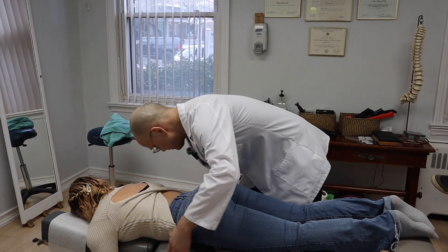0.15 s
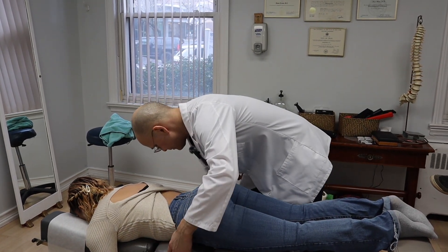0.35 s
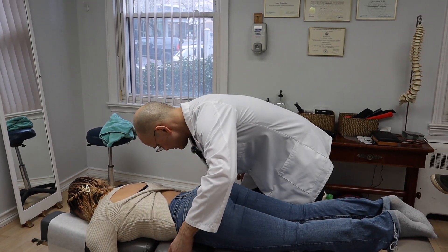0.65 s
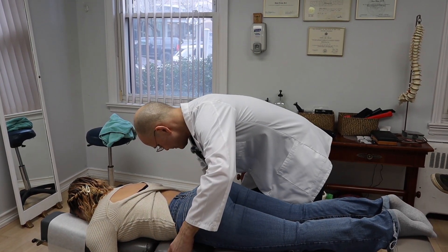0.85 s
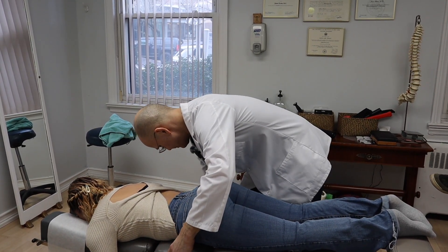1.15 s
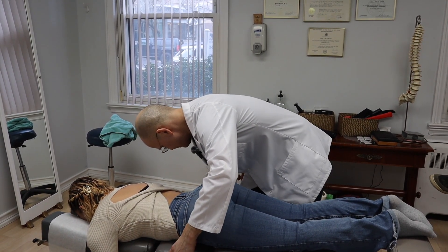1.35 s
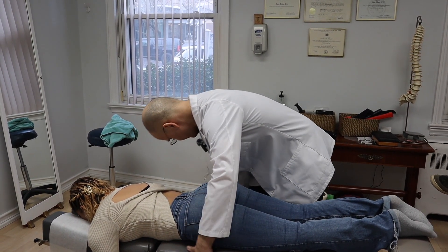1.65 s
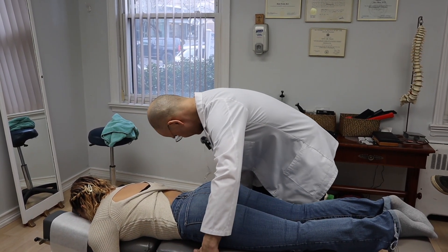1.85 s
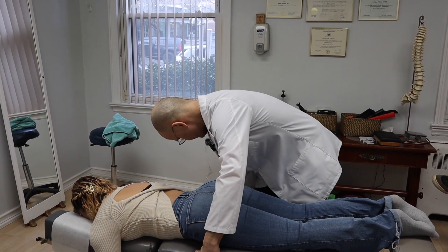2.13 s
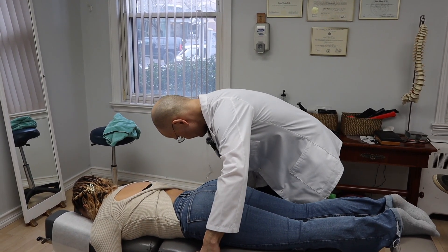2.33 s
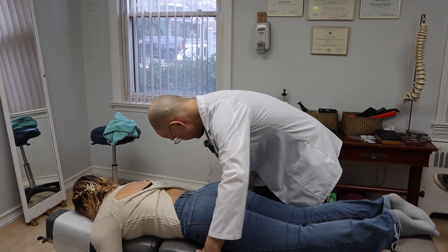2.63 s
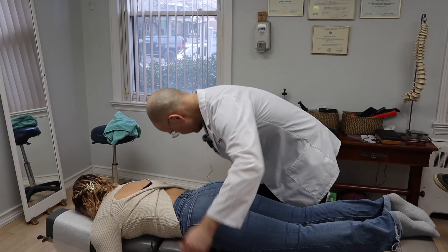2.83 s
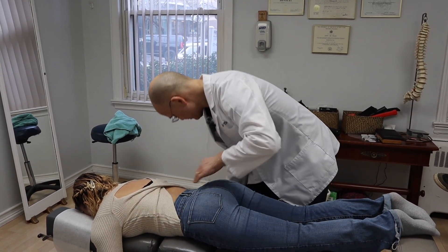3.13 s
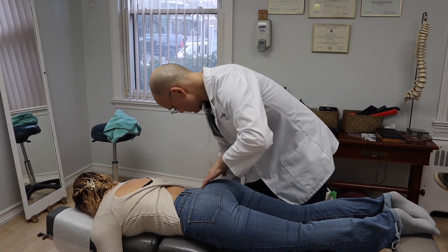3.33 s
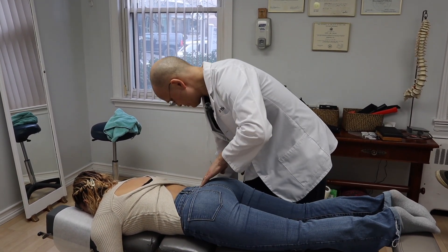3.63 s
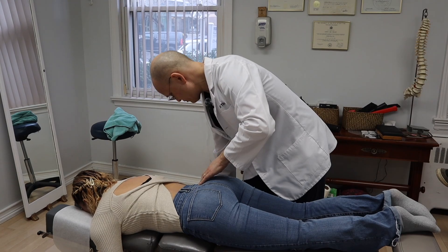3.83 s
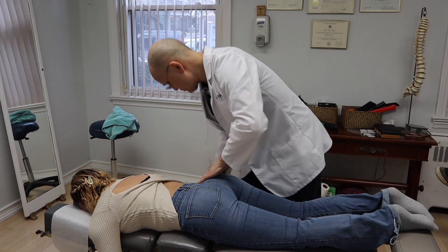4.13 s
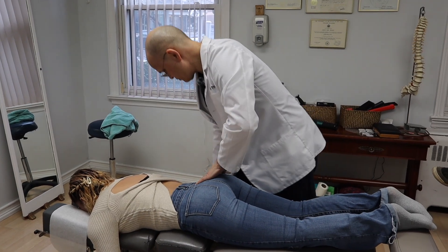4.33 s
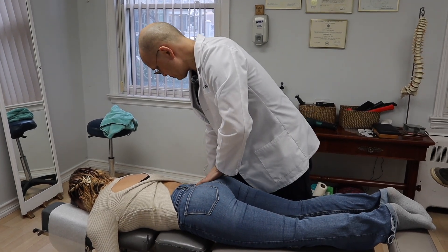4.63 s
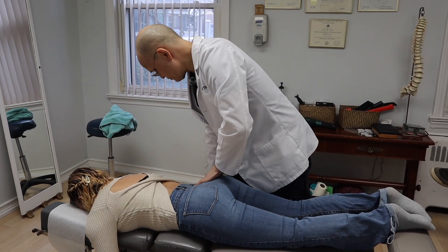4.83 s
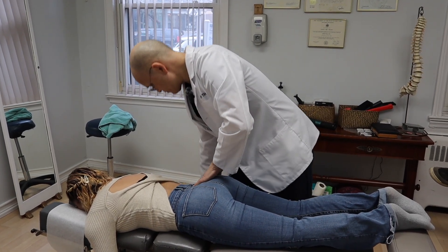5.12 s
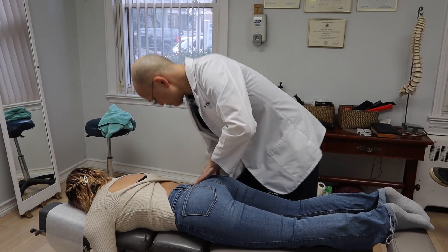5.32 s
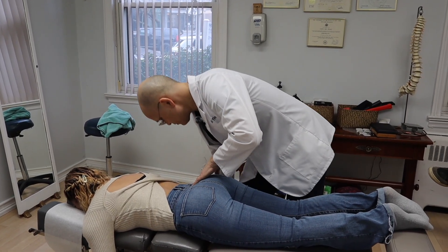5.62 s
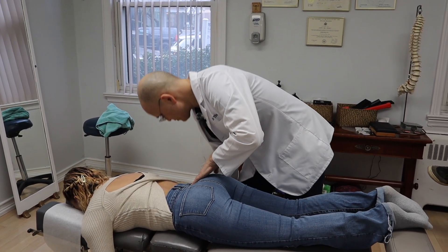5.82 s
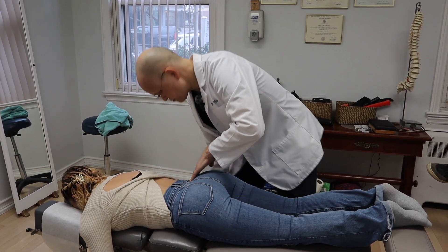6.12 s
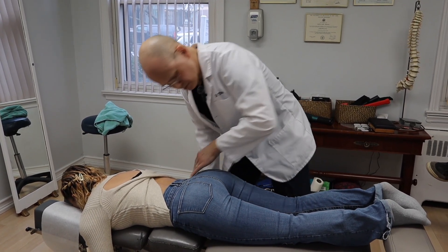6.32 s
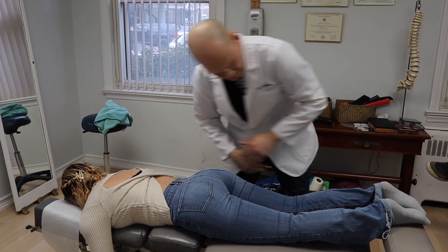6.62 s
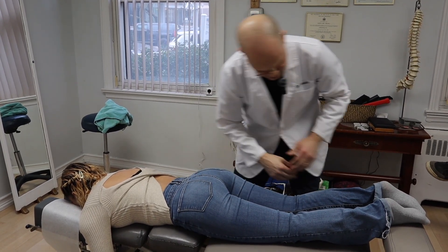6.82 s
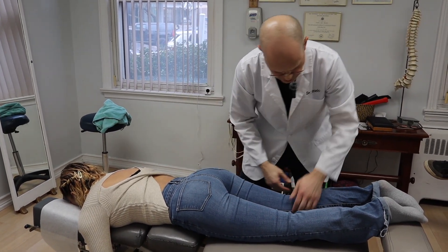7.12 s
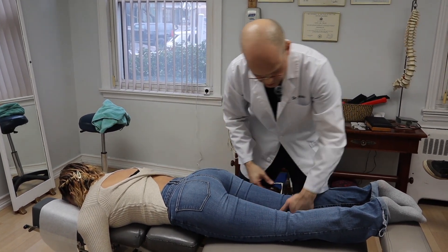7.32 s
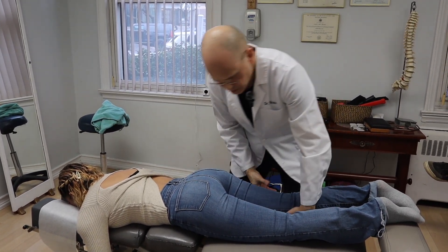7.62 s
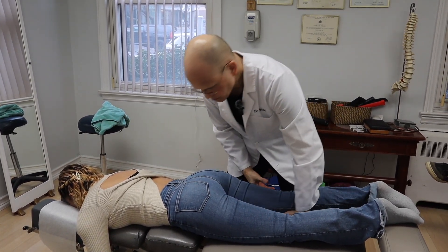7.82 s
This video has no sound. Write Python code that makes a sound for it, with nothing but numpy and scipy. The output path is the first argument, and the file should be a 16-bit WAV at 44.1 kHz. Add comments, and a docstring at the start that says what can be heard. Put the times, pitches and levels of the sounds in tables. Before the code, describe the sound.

In a small treatment room, a drop table's catch is jogged, clacking with a short steel ring and light clicks between. A burst of hard frame knocks follows, then separate padded thuds and two section falls that bounce rapidly to rest, the second loudest. Cloth rustles, hands pat fabric and tiny fittings tink over faint ventilation hum. One fixed microphone in the room hears it in mono, ducking briefly after loud blows.

```python
"""A padded drop table in a small treatment room, heard in mono from one fixed spot by a camera's microphone.
First a section is jogged against its steel catch: noise bursts and damped modes clack, with light lifts between.
Then hand thrusts knock the loose frame, drop the cushions with dull thuds, and twice a section falls and bounces;
these are filtered noise and decaying sines. Fabric pats and steel tinks fall in between.
Cloth and ventilation noise with a faint hum run throughout; the camera's gain control ducks after loud blows."""
import sys
import numpy as np
from scipy import signal
from scipy.fft import rfft, irfft, next_fast_len
from scipy.io import wavfile
from scipy.ndimage import uniform_filter1d, map_coordinates

SR = 44100
rng = np.random.default_rng(int(sys.argv[2]) if len(sys.argv) > 2 else 0)


def store_pcm(level_fs):
    """Save levels as 16-bit WAV."""
    pcm = np.round(np.clip(level_fs, -1, 1) * 32767).astype(np.int16)
    wavfile.write(sys.argv[1], SR, np.atleast_2d(pcm).T)


N = 351124
LENGTH = 24576  # samples in one blow
T = np.arange(LENGTH) / SR
HZ = np.fft.rfftfreq(LENGTH, 1 / SR)

# spectrum of the wooden body, also used by knock: (frequency [Hz], level [dB])
BODY_SPECTRUM = [(40, -19), (100, -15), (200, -9), (400, 0), (1000, 1), (1600, -5), (2200, -5),
                 (3500, -31.5), (7000, -46.5)]
# spectrum of loose fittings, also used by knock and drops: (frequency [Hz], level [dB])
RATTLE_SPECTRUM = [(900, -17.5), (1900, -11.5), (2700, 1), (3600, -1.5), (4400, -8), (5500, -5.5),
                   (7000, -14), (10000, -23.5), (13000, -30), (16000, -44.5)]
# the catch clacks, mostly ringing slams home, the first a faint lift:
# (time [s], level [dB], ring of the catch against the body [dB])
CLACKS = [(0.206, -38, 3), (.267, -19, 7), (0.562, -17, 7), (.769, -21.5, 6.5), (.834, -15, 4.5),
          (1.145, -10.5, -1.5), (1.431, -17, 3.5)]
# further light lifts of the catch: (time [s], level [dB])
LIFTS = [(0.483, -30.5), (0.998, -39), (1.065, -27.5), (1.301, -40.5), (1.366, -31)]
# modes of the catch in a clack: (frequency [Hz], level [dB], t60 [s])
CLACK_MODES = [(920, -4, 0.24), (939, -11, 0.17), (980, 3, 0.17), (991.4, -12, 0.3), (1274, -18, 0.2),
               (1410, -16.5, 0.18), (2000, -29.5, 0.38), (2460, -17.5, 0.29), (2745, -21.5, 0.22),
               (2930, -24.5, 0.24), (3660, -27.5, 0.1), (5700, -28, 0.11)]
# modes of the lifted catch: (frequency [Hz], level [dB], t60 [s])
LIFTED_CATCH_MODES = [(790, 6, 0.18), (915, -2, 0.66), (1900, 0, 0.23), (2680, -4.5, .18), (3806, -7, .16)]
# resonances of the catch's housing: (frequency [Hz], width [Hz], level before the lift in peaks [dB])
HOUSING_PEAKS = [(2856, 110, 4.5), (3050, 52, -17.5), (3780, 200, 3.5), (5220, 190, 3.5), (7870, 290, 2),
                 (9250, 200, 3)]
# a clack of CLACK_DB gives this rattle, and this thump at time 0; each grows by so many dB per dB of strength
CLACK_DB = -16
CLACK_RATTLE_DB, CLACK_RATTLE_GROWS = -20, 1.37
CLACK_THUMP_DB, CLACK_THUMP_GROWS = -34.5, 0.16
SWING_DB_PER_S = 9  # the cushion swings wider as the jogging goes on
# a harder clack drags its fittings along for longer; at CLACK_DB the rise takes 3.5 of these steps
CLACK_RISE_STEP_S, STEP_DOUBLES_DB = 0.00095, 3.5
LIFT_RATTLE_DB, LIFT_THUMP_DB = -6, -4.5  # against the lift's click


def catch():
    """The catch clacks, ringing, with light lift clicks between; the heavy cushion's swing builds up more slowly."""
    out = np.zeros(N)
    wood = amp(along(BODY_SPECTRUM, HZ)) * resonance(1200, q=0.81)
    fittings = amp(along(RATTLE_SPECTRUM, HZ)) * peaks(HOUSING_PEAKS)
    for s, db, ring_db in CLACKS:
        force = db - CLACK_DB
        rattle_db = CLACK_RATTLE_DB + CLACK_RATTLE_GROWS * force
        thump_db = CLACK_THUMP_DB + CLACK_THUMP_GROWS * force + SWING_DB_PER_S * s
        rise = CLACK_RISE_STEP_S * (2.5 + 2 ** (force / STEP_DOUBLES_DB))
        body = blow(colour(contact(rise=0.0091, t60=0.072, wet_db=-5), wood))
        steel = amp(ring_db) * ring(CLACK_MODES, rise=.005, scatter_db=2)
        rattle = blow(colour(contact(rise, t60=0.041, wet_db=-5.0), fittings))
        clack = amp(db) * blow(body + steel)
        add(out, s, clack + amp(rattle_db) * rattle + amp(thump_db) * thump(rise=0.015))
    for s, db in LIFTS:
        tap = blow(colour(contact(rise=0.0061, t60=0.018, wet_db=2.0), wood))
        ping = ring(LIFTED_CATCH_MODES, rise=.004, scatter_db=1.5)
        click = blow(ping + amp(-0.5) * tap)
        loose_steel = fittings * resonance(3000, q=0.64)
        rattle = blow(colour(contact(rise=0.0016, t60=0.053, wet_db=-2.5), loose_steel))
        lift = click + amp(LIFT_RATTLE_DB) * rattle + amp(LIFT_THUMP_DB) * thump(rise=0.0071)
        add(out, s, amp(db) * lift)
    return out


# single knocks of the frame: (time [s], level [dB], panel resonance [Hz], treble tilt [dB per octave])
KNOCKS = [(1.566, -35, 1230, -2), (2.358, -34.5, 890, 8.5), (2.371, -26.5, 1500, 1),
          (2.4, -32.5, 1500, 2.5), (2.622, -37.5, 1030, 3.5), (2.65, -8.5, 800, -0.5),
          (2.656, -14.5, 740, -7.5), (2.666, -14, 820, 2), (2.722, -18.5, 780, -3.5), (2.759, -31, 900, 1),
          (2.868, -35.5, 513, -2), (3.376, -33, 1220, -6), (3.406, -33, 1100, -4.5),
          (4.605, -12, 1040, 7.5), (5.822, -21.5, 1330, 9), (6.802, -14.5, 750, 0), (6.838, -28, 650, 2)]
# the table settles back after a thrust: (time [s], level [dB])
SETTLES = [(2.823, -37), (3.864, -28.5), (6.105, -26)]


def frame():
    """The frame knocks under the thrusts, then shudders softly and sways as the weight comes off."""
    out = np.zeros(N)
    for s, db, panel_hz, tilt_db in KNOCKS:
        add(out, s, knock(db, panel_hz, tilt_db, panel_db=5))
    for s, db in SETTLES:
        shudder = knock(db, panel_hz=354, tilt_db=-1.0, panel_db=13.5, give=0.021)
        add(out, s, shudder + amp(db - 6) * sway())
    return out


# a section is let fall and bounces to rest: (time [s], level [dB], first flight [s], loss a bounce [dB])
FALLS = [(4.138, -9, .149, 3.5), (6.366, 0.5, .1455, 5)]
FLIGHT_KEPT, FLIGHT_LOST_S = .845, .012  # each flight keeps this share, then loses this time
# a rebound after a flight longer than HARD_FLIGHT_S booms the large panel, the others a small one
HARD_FLIGHT_S, HARD_PANEL_HZ, SOFT_PANEL_HZ = .1, 750, 1000
LANDING_DB, LANDING_THUMP_DB, LANDING_SWAY_DB = 1, -9, -18.5  # first landing, against the fall's level
REBOUND_TILT_DB, DULLER_DB = 2.5, .2  # treble tilt per octave of the first rebound; its fall per dB lost
# after shorter flights the section sinks into its padding, slower by this share of the shortfall
SOFT_FLIGHT_S, SINK_SHARE = 0.086, 0.23


def falls():
    """A section lands heavily and bounces; damping and friction shorten flights and weaken and dull rebounds."""
    out = np.zeros(N)
    for s, db, flight, loss_db in FALLS:
        landing = knock(db + LANDING_DB, SOFT_PANEL_HZ, tilt_db=.8, panel_db=-18, give=.0007)
        landing_thump = amp(db + LANDING_THUMP_DB) * thump(rise=0.006)
        add(out, s, landing + landing_thump + amp(db + LANDING_SWAY_DB) * sway())
        for bounce in range(5):
            s += flight
            lost_db = loss_db * bounce
            panel_hz = HARD_PANEL_HZ if flight > HARD_FLIGHT_S else SOFT_PANEL_HZ
            tilt_db = REBOUND_TILT_DB - DULLER_DB * lost_db
            give = SINK_SHARE * max(SOFT_FLIGHT_S - flight, 0)
            add(out, s, knock(db - lost_db, panel_hz, tilt_db, panel_db=2.5, give=give))
            flight = FLIGHT_KEPT * flight - FLIGHT_LOST_S
    return out


# a cushion drops on its stop: (time [s], board frequency [Hz], board level [dB],
# board chatter t60 [s] (its swing dies in half of that), plate frequency [Hz], plate level [dB],
# snap level [dB], cushion thump level [dB])
DROPS = [(3.5997, 475, -10.5, 0.095, 1430, -7, -22.5, -25.5), (4.6024, 332, -4, 0.16, 1034, -14, -6, -12.5),
         (5.9614, 400, -8, 0.023, 960, -9, -44.5, -31)]


def drops():
    """A hard push swings a heavily damped board and plate for a few cycles; the stop snaps, the room answers."""
    out = np.zeros(N)
    for s, board_hz, board_db, board_t60, plate_hz, plate_db, snap_db, thump_db in DROPS:
        board_gain = resonance(board_hz, q=1.5) * resonance(board_hz / 2, q=0.52)
        board_swing = np.sin(2 * np.pi * board_hz * T) * fade(board_t60 / 2)
        board_chatter = blow(colour(contact(rise=0.00037, t60=board_t60, wet_db=-1), board_gain))
        board = blow(colour(board_swing, board_gain)) + amp(2) * board_chatter

        plate_gain = resonance(plate_hz, q=1.3) * resonance(plate_hz, q=.55)
        plate_swing = np.sin(2 * np.pi * plate_hz * T) * fade(.02) * (1 - np.exp(-T / .001))
        plate_chatter = blow(colour(contact(rise=0.001, t60=0.022, wet_db=3), plate_gain))
        plate = blow(plate_swing) + amp(2) * plate_chatter

        snap_gain = amp(along(RATTLE_SPECTRUM, HZ))
        snap = blow(colour(contact(rise=0.0016, t60=0.045, wet_db=-3.5), snap_gain))
        thud = amp(board_db) * blow(board) + amp(plate_db) * blow(plate)
        add(out, s, thud + amp(snap_db) * snap + amp(thump_db) * thump(rise=.012))
    return out


# hands pat cloth and upholstery: (time [s], level [dB], centre frequency [Hz])
TOUCHES = [(1.794, -45.5, 692), (2.183, -46.5, 670), (2.255, -49, 830), (3.528, -40, 600),
           (4.043, -42, 430), (4.924, -52, 990), (5.008, -52.5, 3380), (5.333, -54, 2000),
           (5.428, -43.5, 1040), (6.259, -42, 480), (6.327, -38, 790), (7.27, -34, 650), (7.929, -44, 810)]
PAT_CYCLES = 2.8  # rise of a pat in cycles: the softer the contact, the lower and slower


def touches():
    """Hands on fabric make soft, broad puffs of resonant noise."""
    out = np.zeros(N)
    for s, db, hz in TOUCHES:
        pad = resonance(hz, q=1.1) * resonance(600, q=0.26)
        pat = blow(colour(contact(PAT_CYCLES / hz, t60=0.083, wet_db=-1), pad))
        add(out, s, amp(db) * pat)
    return out


# small steel fittings tink: (time [s], frequency [Hz], level [dB])
TINKS = [(2.028, 5680, -52), (2.028, 8440, -57.5), (2.243, 6600, -56), (2.403, 7870, -46.5),
         (2.535, 7060, -55), (3.866, 14000, -46), (5.823, 6370, -27)]


def tinks():
    """Small steel fittings tink: short noise bursts through a narrow resonance."""
    out = np.zeros(N)
    for s, hz, db in TINKS:
        tink = blow(colour(contact(rise=0.0032, t60=0.017, wet_db=-2), resonance(hz, q=13) ** 2))
        add(out, s, amp(db) * tink)
    return out


# coat and jeans rub as the hands move: (start time [s], length [s], level [dB])
STROKES = [(0, 1, -48.5), (1.56, 0.033, -41), (2.227, 0.62, -47), (3.85, 1.24, -54.5), (6.127, 1.223, -48),
           (7.166, 0.9, -47.5)]
# spectrum of rubbing cloth: (frequency [Hz], level per Hz [dB])
CLOTH_SPECTRUM = [(150, -2.5), (500, 3), (900, 2.5), (1800, -7), (3800, -3.5), (5500, -8), (8000, -15.5),
                  (15000, -24)]
# spectrum of the ventilation: (frequency [Hz], level per Hz [dB])
AIR_SPECTRUM = [(12, -22.5), (22, -6), (60, 5), (85, -8.5), (130, -8), (200, -7), (300, -13), (550, -22),
                (1000, -25.5), (2000, -26), (3500, -27.5), (7000, -34), (16000, -36)]
STROKE_ATTACK_S, STROKE_RELEASE_S, RESTING_CLOTH_DB = 0.02, 0.24, -62


def background():
    """Ventilation with a low hum, and cloth that rubs unevenly: each stroke rises, holds and dies away."""
    t = np.arange(N) / SR
    hum = amp(-60.5 + 1.3 * wobble(2)) * unit(np.sin(2 * np.pi * 58.5 * t))
    power = amp(RESTING_CLOTH_DB) ** 2
    for s, length, db in STROKES:
        attack = np.clip((t - s) / STROKE_ATTACK_S, 0, 1)
        release = np.exp(-np.maximum(t - s - length, 0) / STROKE_RELEASE_S)
        power = power + (amp(db) * attack * release) ** 2
    cloth = np.sqrt(power) * amp(0.74 * wobble(25)) * noise(CLOTH_SPECTRUM)
    return amp(-47.5) * noise(AIR_SPECTRUM) + hum + cloth


# resonances of the frame: (frequency [Hz], width [Hz], level before the lift in peaks [dB])
FRAME_PEAKS = [(302, 22, -3), (450.6, 8.5, -5), (535, 15, -5.5), (658, 7.3, 4.5), (1010, 75, -2.5),
               (1603, 63, 4), (1990, 42, -1.5), (2680, 44, 4), (3000, 77, -3), (3275, 40, 5),
               (3750, 100, 2.5), (5230, 110, -16)]
# a knock of KNOCK_DB gives this rattle, thump and rise; harder ones rattle and thump more and start faster
KNOCK_DB = -10
KNOCK_RATTLE_DB, KNOCK_RATTLE_GROWS = -14.5, 1.103
RATTLE_PER_TILT = 0.3  # dB of rattle per dB of tilt: bright knocks rattle more
KNOCK_THUMP_DB, KNOCK_THUMP_GROWS = -23, 0.88
KNOCK_RISE_S, RISE_HALVES_DB = 0.0014, 22


def knock(db, panel_hz, tilt_db, panel_db, give=0):
    """A knock sounds a panel, the frame, loose fittings and the cushion; padding that gives (s) slows it."""
    force = db - KNOCK_DB
    rise = give + KNOCK_RISE_S * 2 ** (-force / RISE_HALVES_DB)
    rattle_db = KNOCK_RATTLE_DB + KNOCK_RATTLE_GROWS * force + RATTLE_PER_TILT * tilt_db
    thump_db = KNOCK_THUMP_DB + KNOCK_THUMP_GROWS * force
    tubes = peaks(FRAME_PEAKS)
    panel = amp(along(BODY_SPECTRUM, HZ)) * (1 + amp(panel_db) * resonance(panel_hz, q=13))
    tilt = tilt_db * np.log2(np.maximum(HZ, 900) / 3000)
    fittings = amp(along(RATTLE_SPECTRUM, HZ) + tilt)
    body = blow(colour(contact(rise, t60=0.064, wet_db=-2.5), panel * tubes))
    rattle = blow(colour(contact(rise, t60=0.054, wet_db=-4.5), fittings * tubes))
    return amp(db) * blow(body) + amp(rattle_db) * rattle + amp(thump_db) * thump(rise=0.012)


# modes of the loaded cushion: (frequency [Hz], level [dB], t60 [s])
CUSHION_MODES = [(110.6, -10, 0.12), (136.1, 0, 0.44), (152.8, -2, 0.3), (184.6, -10, 0.31)]


def thump(rise):
    """The loaded cushion swings on its modes and pushes a broad, low puff into the room."""
    swing = ring(CUSHION_MODES, rise, scatter_db=1.5)
    puff_gain = resonance(160, q=1.7) * resonance(145, q=0.44)
    puff = blow(colour(contact(rise, t60=0.09, wet_db=3), puff_gain))
    return blow(swing + amp(-1.5) * puff)


# modes of the table's base: (frequency [Hz], level [dB], t60 [s])
BASE_MODES = [(52.9, 1, 0.53), (60, -9.5, 0.22), (87, 9, 0.3)]


def sway():
    """The table's base sways with a deep, short boom."""
    return ring(BASE_MODES, rise=.015, scatter_db=1)


STRIKE_DETUNE = 0.0038  # spread as a share of pitch: the load shifts the modes a little from blow to blow


def ring(modes, rise, scatter_db):
    """Damped modes, struck with new strengths and slightly new pitches each time."""
    hz, db, t60 = np.transpose(modes)[:, :, None]
    hz = hz * (1 + STRIKE_DETUNE * rng.standard_normal(hz.shape))
    phase = rng.uniform(0, 2 * np.pi, hz.shape)
    size = amp(db + scatter_db * rng.standard_normal(hz.shape))
    swings = size * fade(t60) * np.sin(2 * np.pi * hz * T + phase)
    return blow(np.sum(swings, 0) * (1 - np.exp(-(T / rise) ** 2)))


def contact(rise, t60, wet_db):
    """Loose parts chatter in uneven spikes; the room returns that ripple and a diffuse wash."""
    onset = 1 - np.exp(-(T / rise) ** 2)
    knots = rng.standard_normal(LENGTH // 32 + 4)  # one every 32 samples
    spikes = amp(3.5 * map_coordinates(knots, [np.arange(LENGTH) / 32], order=1))
    chatter = rng.standard_normal(LENGTH) * spikes * onset * fade(t60)
    echo = blow(signal.fftconvolve(chatter, room())[:LENGTH])
    return blow(chatter) + amp(wet_db) * blow(echo + room() * onset)


# reverberation of the room: (frequency [Hz], t60 [s])
ROOM_DECAY = [(80, 0.64), (210, 0.33), (400, 0.31), (1500, 0.28), (3900, .28), (7000, 0.2), (14000, 0.18)]


def room(build=0.0072):
    """A fresh noise answer of the room builds up and decays; the treble dies first."""
    hz, t, z = signal.stft(rng.standard_normal(LENGTH), SR, nperseg=256)
    decay = fade(along(ROOM_DECAY, hz)[:, None], t)
    tail = signal.istft(z * decay, SR, nperseg=256)[1][:LENGTH]
    return blow(tail * (1 - np.exp(-T / build)))


def resonance(hz, q):
    """Gain of one resonance, 1 at its top."""
    return 1 / np.sqrt(1 + (q * ((HZ + 1) / hz - hz / (HZ + 1))) ** 2)


def peaks(table):
    """Gain of a body whose resonances, each lifted by 2 dB, stand above an even ground."""
    return np.sqrt(1 + sum((amp(db + 2) * resonance(hz, hz / width)) ** 2 for hz, width, db in table))


def colour(x, gain):
    """Causal minimum-phase filter with the given gain: nothing sounds before the blow."""
    cepstrum = irfft(np.log(np.maximum(gain, 1e-6)))
    # fold the cepstrum onto positive time
    cepstrum[1:LENGTH // 2] *= 2
    cepstrum[LENGTH // 2 + 1:] = 0
    return irfft(rfft(x) * np.exp(rfft(cepstrum)))


def noise(spectrum):
    """Steady noise of rms 1."""
    size = next_fast_len(N + LENGTH)
    gain = amp(along(spectrum, np.fft.rfftfreq(size, 1 / SR)))
    return unit(irfft(rfft(rng.standard_normal(size)) * gain, size)[:N])


def wobble(rate):
    """A smooth random curve, rate knots a second."""
    knots = rng.standard_normal(int(N * rate / SR) + 4)
    return map_coordinates(knots, [np.arange(N) * rate / SR])


def amp(db):
    """Decibels to amplitude."""
    return 10 ** (np.asarray(db) / 20)


def unit(x):
    """Scale to rms 1."""
    return x / np.sqrt(np.mean(x ** 2) + 1e-20)


def blow(x):
    """Scale a blow to rms 1 over its first 50 ms."""
    return x / np.sqrt(np.mean(x[:SR // 20] ** 2) + 1e-20)


def fade(t60, t=T):
    """Exponential decay by 60 dB in t60 seconds."""
    return np.exp(-np.log(1000) * t / t60)


def along(points, hz):
    """Interpolate (Hz, value) points on a log axis."""
    f, v = np.transpose(points)
    return np.interp(np.log(hz + 1), np.log(f + 1), v)


def add(track, s, x):
    """Lay x into the track at time s."""
    part = track[round(s * SR):][:len(x)]
    part += x[:len(part)]


def scene():
    """The table, the hands and the room, summed at one microphone."""
    table = catch() + frame() + falls() + drops()
    return (table + touches() + tinks() + background())[None]


def gain_control(x, limit_db, recovery_db):
    """The gain falls at once when the level passes the limit and creeps back at recovery_db a second."""
    power = np.abs(uniform_filter1d(x[0] ** 2, SR // 250))  # 4 ms average
    excess = np.maximum(10 * np.log10(power + 1e-12) - limit_db, 0)
    creep = recovery_db * np.arange(N) / SR
    return x * amp(creep - np.maximum.accumulate(excess + creep))


TOP_HZ = 16000  # the camera's band limit


def record(dry):
    """The camera's microphone channel: gain control, clipping at full scale and a sharp band limit."""
    loud = np.clip(gain_control(dry, limit_db=-7.0, recovery_db=15.0), -1, 1)
    size = next_fast_len(N + LENGTH)
    band = np.fft.rfftfreq(size, 1 / SR) < TOP_HZ
    return irfft(rfft(loud, size) * band, size)[:, :N]


dry = scene()
out = record(dry)
store_pcm(out)
```